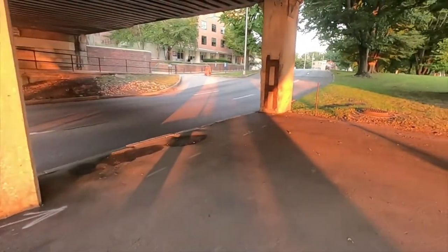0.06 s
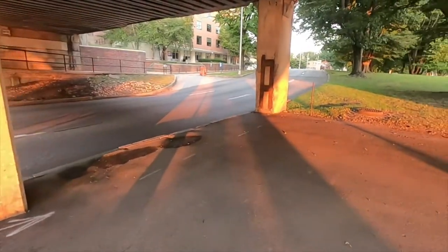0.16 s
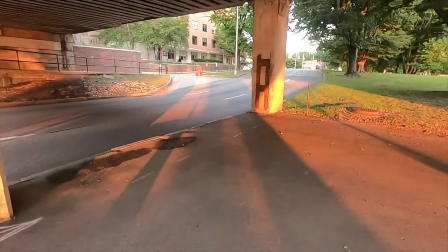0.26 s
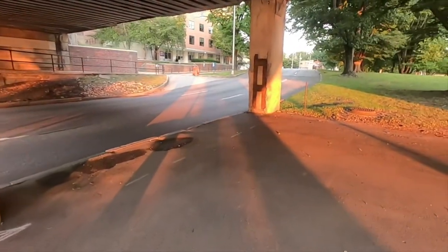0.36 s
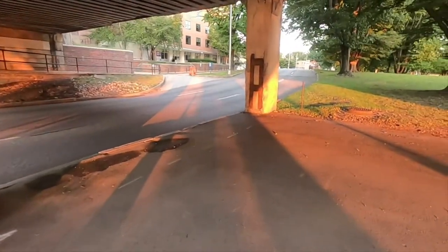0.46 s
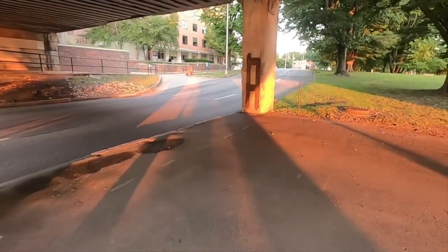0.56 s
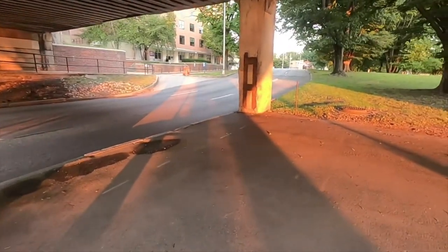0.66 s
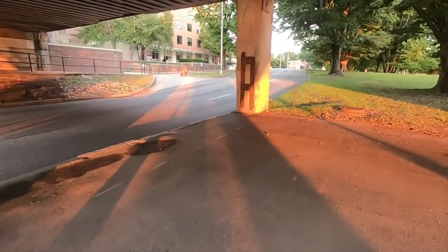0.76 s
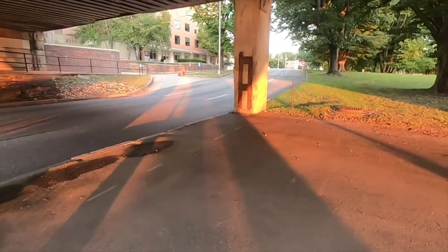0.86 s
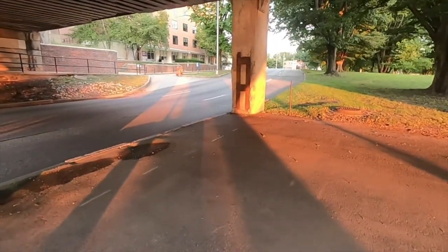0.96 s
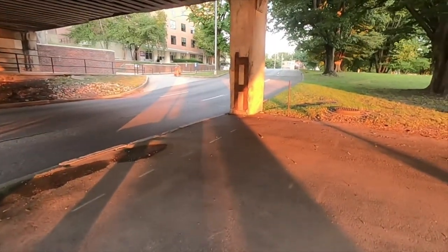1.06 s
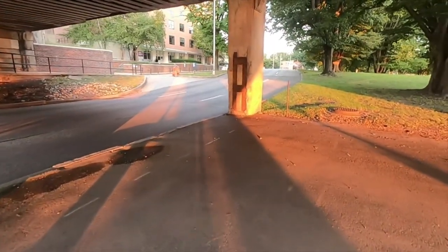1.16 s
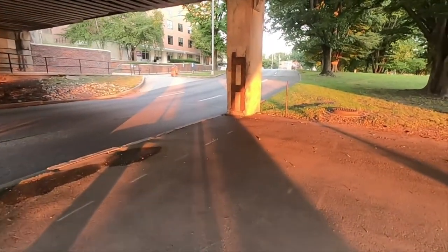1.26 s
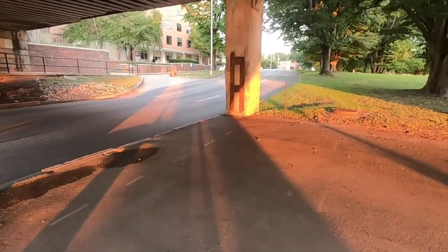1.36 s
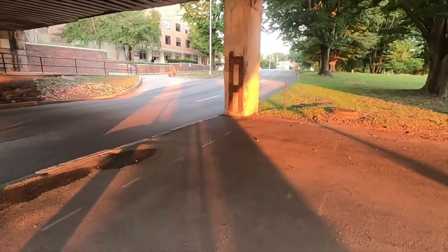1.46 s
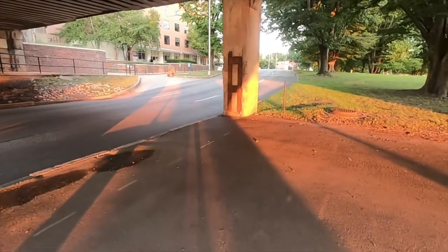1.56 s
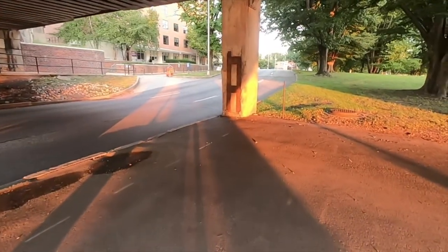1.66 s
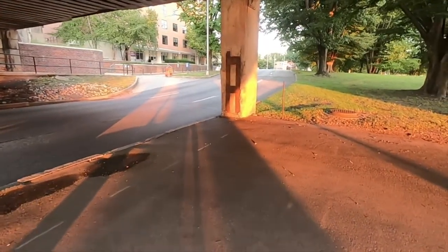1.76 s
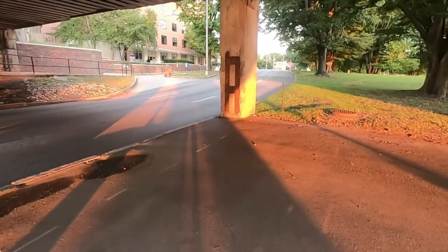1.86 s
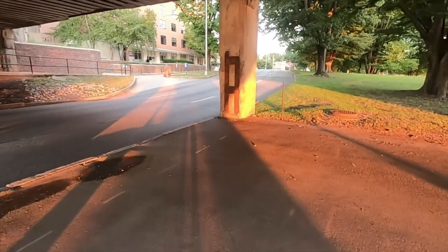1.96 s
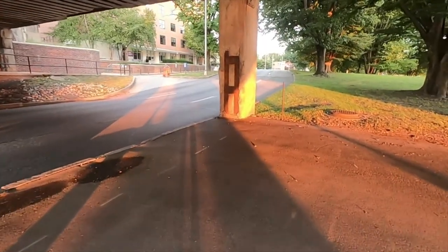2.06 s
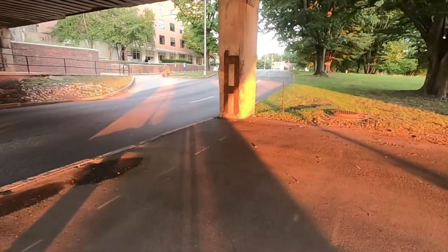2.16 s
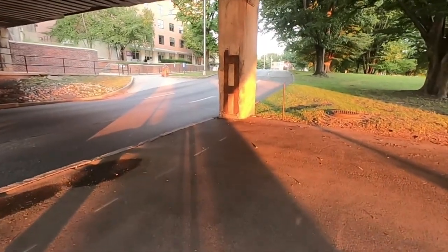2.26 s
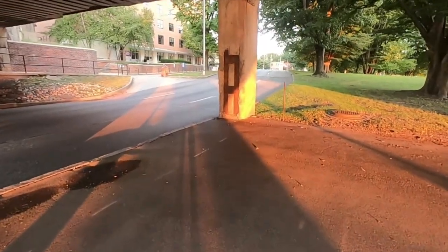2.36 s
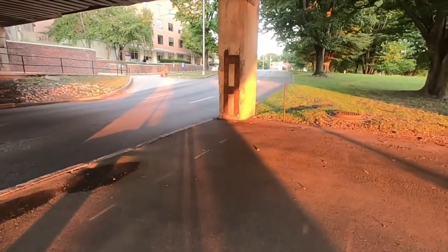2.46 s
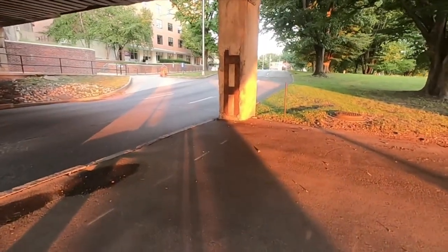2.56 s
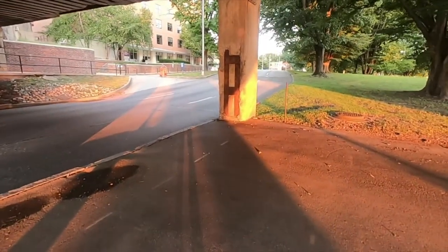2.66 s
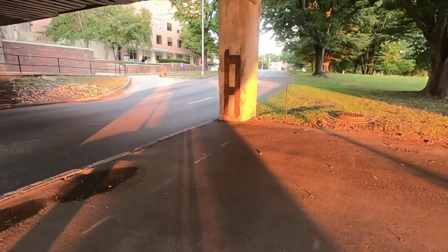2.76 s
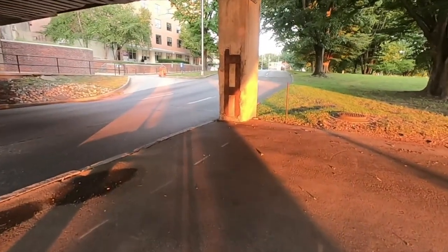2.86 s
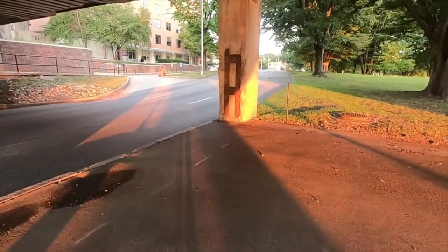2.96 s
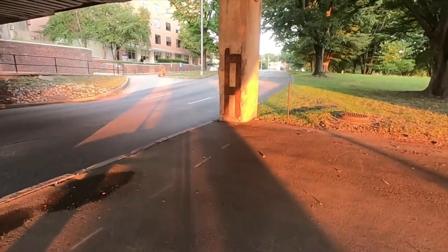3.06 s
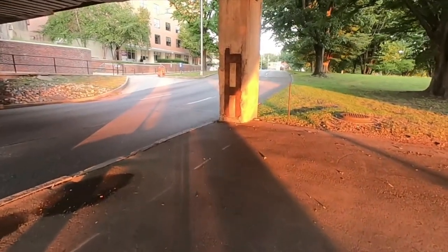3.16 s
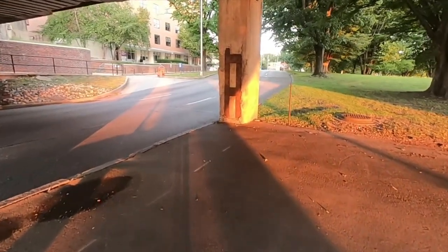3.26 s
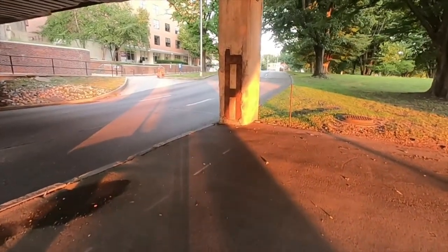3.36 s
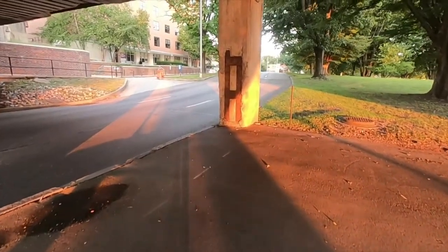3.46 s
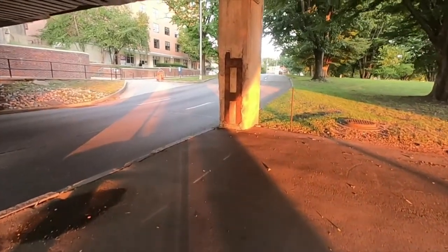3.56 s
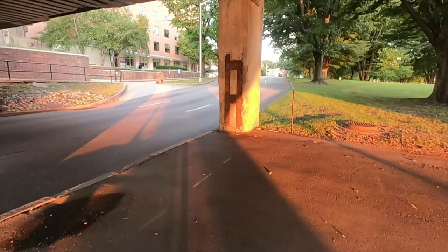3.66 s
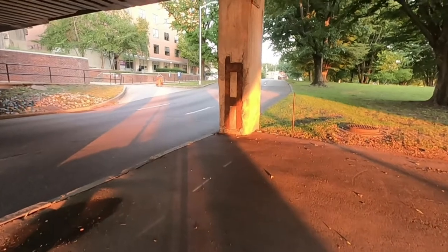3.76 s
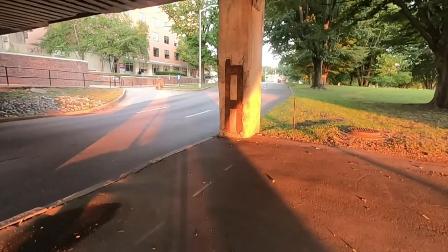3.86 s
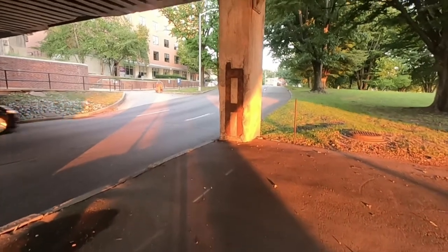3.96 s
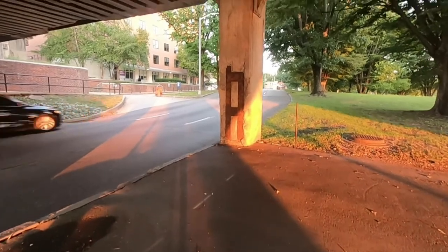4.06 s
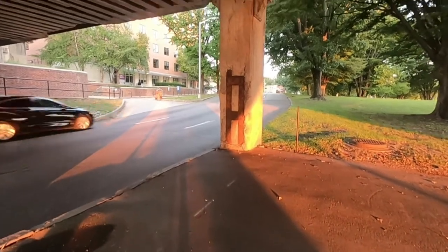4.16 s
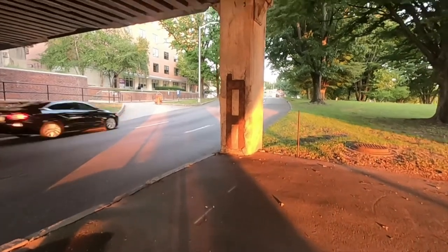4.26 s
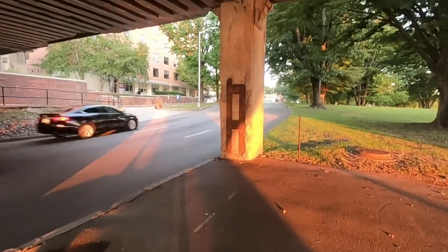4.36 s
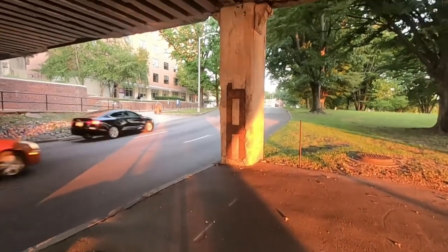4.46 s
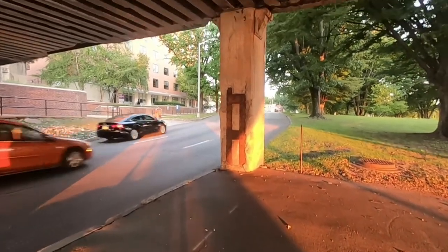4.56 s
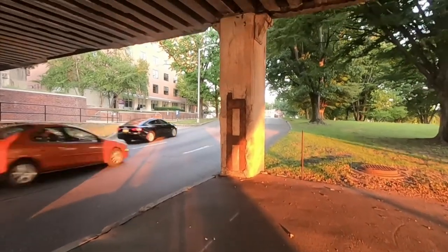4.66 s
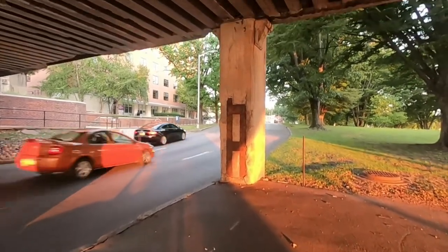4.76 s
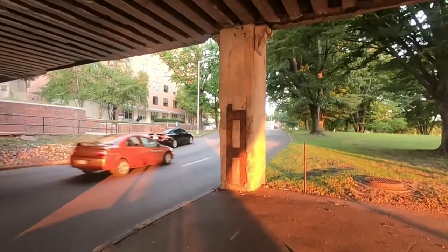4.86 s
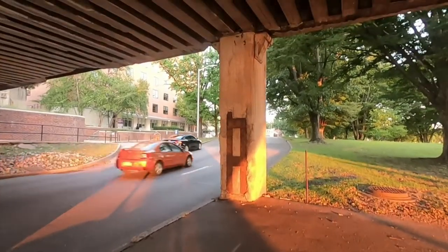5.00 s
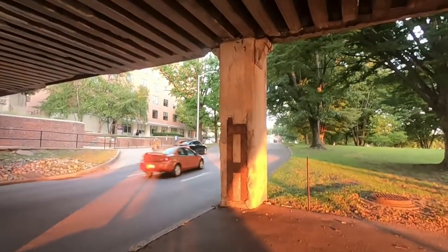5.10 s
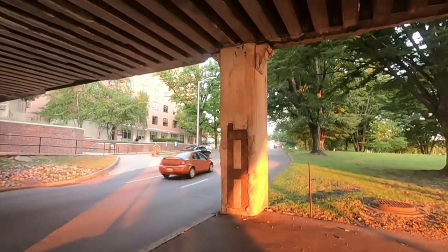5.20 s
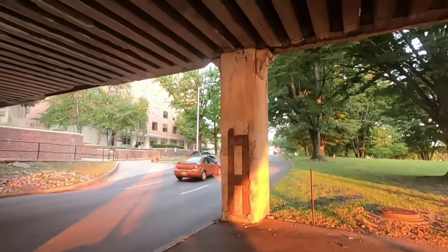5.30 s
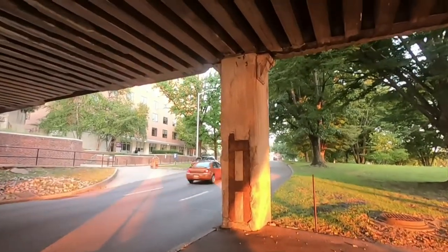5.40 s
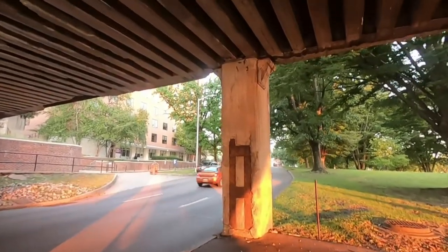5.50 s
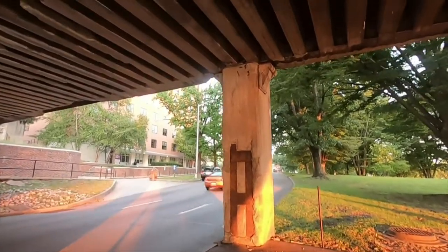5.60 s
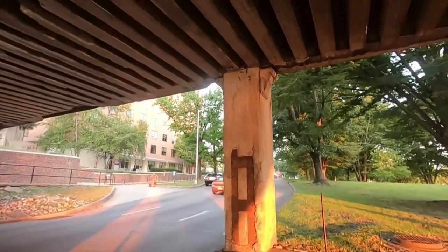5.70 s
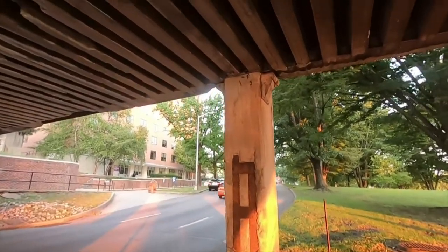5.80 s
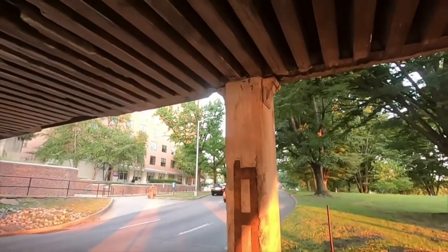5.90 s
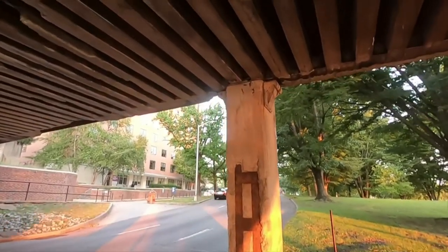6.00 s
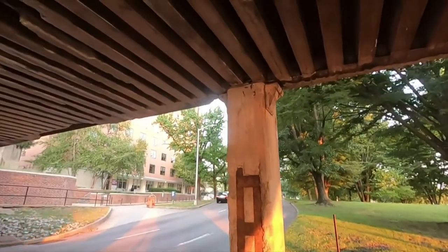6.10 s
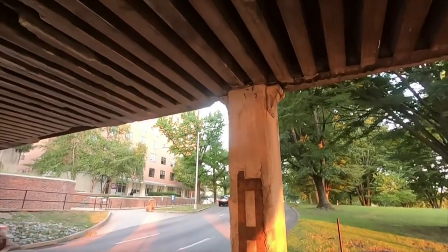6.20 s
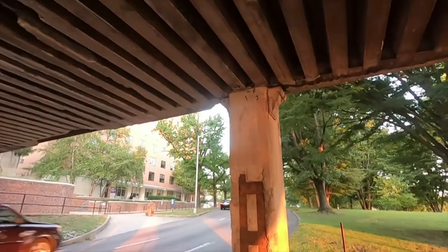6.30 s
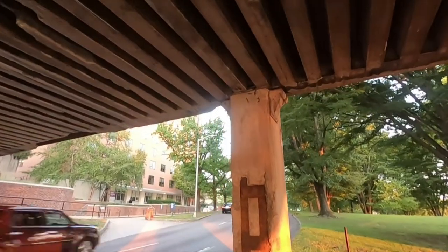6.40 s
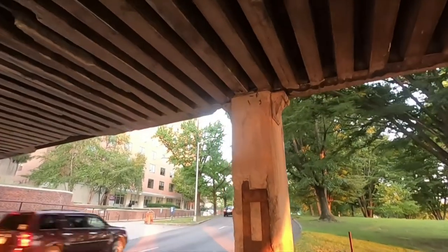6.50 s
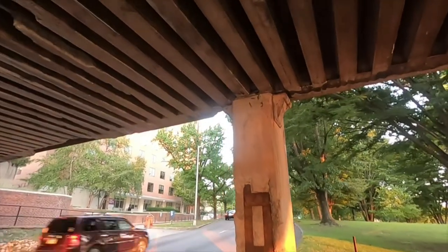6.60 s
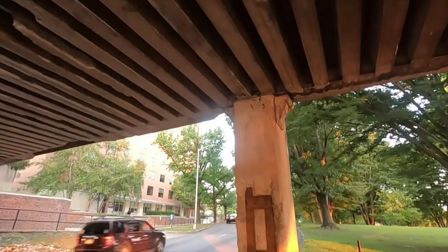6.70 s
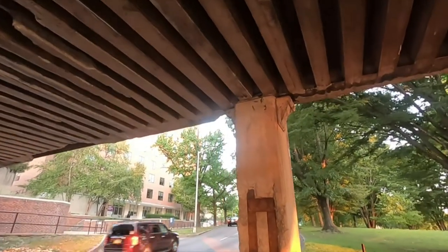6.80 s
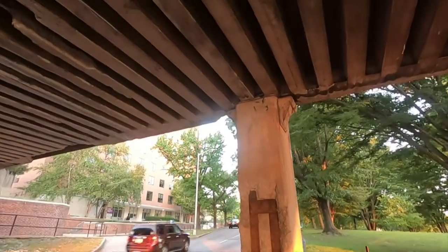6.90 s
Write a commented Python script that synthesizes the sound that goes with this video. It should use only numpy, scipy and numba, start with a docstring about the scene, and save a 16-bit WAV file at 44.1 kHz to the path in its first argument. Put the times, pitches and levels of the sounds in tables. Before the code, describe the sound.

Under a bridge, low traffic rumble and a small knock give way to cars passing close, their tyre roar swelling and fading on the road.

```python
"""Three cars roll through an underpass after a more distant one, from the pavement under the bridge deck.
They pass 3.5 to 8 m from one microphone. Tyre roar is coloured noise set by each car's distance and bearing,
with gliding resonances; the air ring inside the tyres and the low engine drones are wavering sines.
Behind lie bridge throb, far traffic and tree hiss as noise, and a steady hum as a sine;
close by, a small knock sums damped modes and brief rustles are swells of high noise."""
import sys
import numpy as np
from scipy import signal
from scipy.fft import rfft, irfft, next_fast_len
from scipy.io import wavfile
from scipy.ndimage import uniform_filter1d
from numba import njit

SR = 44100
rng = np.random.default_rng(int(sys.argv[2]) if len(sys.argv) > 2 else 0)


def store_wav(level_fs):
    """Save 16-bit WAV to argv[1]."""
    pcm = np.round(np.clip(np.atleast_2d(level_fs), -1, 1) * 32767)
    wavfile.write(sys.argv[1], SR, pcm.T.astype(np.int16))


N = 306054
T = np.arange(N) / SR


def undb(db):
    """Decibels to gain."""
    return 10 ** (np.asarray(db) / 20)


def curves(table):
    """Columns of a table, the first being seconds, drawn as straight lines through every sample."""
    s, *columns = np.transpose(table)
    return [np.interp(T, s, c) for c in columns]


def colour(x, points, skirt_db=-30):
    """Filter by (Hz, dB) points joined on a log axis; outside them the gain changes by skirt_db an octave."""
    hz, db = np.transpose(points)
    size = next_fast_len(N)
    octave = np.log2(np.arange(size // 2 + 1) * SR / size + 1)
    below = np.maximum(np.log2(hz[0]) - octave, 0)
    above = np.maximum(octave - np.log2(hz[-1]), 0)
    gain = undb(np.interp(octave, np.log2(hz), db) + skirt_db * (below + above))
    return irfft(rfft(x, size) * gain, size)[:N]


def walk(rate):
    """Random levels held about 1 / rate seconds and smoothed twice over that time; spread 1."""
    coarse = T[::64]
    hold = max(int(len(coarse) / T[-1] / rate), 1)
    steps = np.repeat(rng.standard_normal(len(coarse) // hold + 1), hold)
    smooth = uniform_filter1d(uniform_filter1d(steps, hold), hold)[:len(coarse)]
    return np.interp(T, coarse, smooth / smooth.std())


def rush(points, flicker_db, rate, band=None):
    """Coloured noise whose level flickers; rms 1 overall, or within the band (Hz)."""
    x = colour(rng.standard_normal(N), points) * undb(flicker_db * walk(rate))
    if band is None:
        return x / x.std()
    inside = signal.sosfilt(signal.butter(4, band, "bandpass", fs=SR, output="sos"), x)
    return x / inside.std()


WHEEL_HZ = 11.5  # wheel turns per second


def tone(hz, db, span, waver, rate, patchy_db, beat=0):
    """A sine wavering in pitch and level, faded over 0.04 s at the ends of its span (s)."""
    ends = np.clip(np.minimum(T - span[0], span[1] - T) / .04, 0, 1)
    phase = 2 * np.pi * np.cumsum(hz * (1 + waver * walk(rate))) / SR
    # an uneven tyre makes the ring throb once a turn
    turn = 2 * np.pi * np.cumsum(WHEEL_HZ * (1 + 0.049 * walk(3.06))) / SR
    throb = 1 + beat * np.sin(turn)
    level = undb(db + patchy_db * walk(11.))
    return np.sqrt(2) * level * ends * throb * np.sin(phase)


@njit
def resonate(x, hz, width):
    """State-variable band-pass with a moving centre, gain 1 there."""
    y, b, l = np.empty(len(x)), 0., 0.
    for i in range(len(x)):
        g, k = np.tan(np.pi * hz[i] / SR), width / hz[i]
        v = (b + g * (x[i] - l)) / (1 + g * (g + k))
        b, l, y[i] = 2 * v - b, l + 2 * g * v, k * v
    return y


# Background levels. Each row: time in seconds, then bridge throb, town rumble and tree hiss, each in dB.
BACKGROUND_DB = [(0, -29, -28.5, -49.5), (.4, -28, -28, -51), (.9, -30, -28, -50.5), (1.5, -32, -28, -51.5),
                 (2.1, -27, -26, -52), (2.7, -29.5, -26.5, -50.5), (3.3, -31.5, -27.5, -50.5),
                 (4.7, -34, -23.5, -50.5), (5.1, -36, -30, -52), (5.4, -40, -25.5, -55),
                 (5.7, -37, -27, -52), (5.95, -39, -25, -53.5), (6.1, -40, -26.5, -50.5),
                 (6.3, -42, -25, -55), (6.94, -35.5, -32, -57)]
# Colour of the deck's throb. Each row: frequency in Hz, gain in dB.
BRIDGE_COLOUR = [(18, -17.5), (25, -4), (35, 1), (48, -2.5), (60, -12.5)]


def bridge_throb():
    """Deep throb of the bridge: flickering noise around 35 Hz."""
    return undb(curves(BACKGROUND_DB)[0]) * rush(BRIDGE_COLOUR, flicker_db=1.5, rate=9)


# Colour of the town's rumble. Each row: frequency in Hz, gain in dB.
RUMBLE_COLOUR = [(42, -8), (55, -1.5), (65, 3.5), (75, 1.5), (92, -0.5), (110, -3.5), (140, -8.5),
                 (220, -12), (330, -15.5), (500, -23), (1000, -43.5)]


def far_traffic():
    """Far traffic: low rumbling noise, strongest around 65 Hz."""
    return undb(curves(BACKGROUND_DB)[1]) * rush(RUMBLE_COLOUR, flicker_db=1.0, rate=10)


# Colour of the trees. Each row: frequency in Hz, gain in dB.
TREE_COLOUR = [(2800, -1.5), (3600, 0.5), (4400, -0.5), (5200, -1), (6300, -7), (7500, -13.5), (8700, -21),
               (10400, -38.5), (11500, -48)]


def tree_hiss():
    """Thin hiss from the trees: noise strongest from about 3 to 5 kHz."""
    return undb(curves(BACKGROUND_DB)[2]) * rush(TREE_COLOUR, flicker_db=0.6, rate=8.3)


# Level of the steady hum. Each row: time in seconds, level in dB.
HUM_LEVEL = [(0, -33), (.12, -29), (.45, -29), (.75, -27), (.92, -35), (1.0, -27.5), (1.4, -27.5),
             (1.5, -38), (1.65, -27), (2.05, -29), (2.7, -34), (3.0, -42), (3.5, -33), (3.8, -45),
             (6.94, -52)]


def steady_hum():
    """A hum steady near 84.2 Hz, its level drifting; its span outlasts the scene, so its ends are not heard."""
    return tone(84.2, *curves(HUM_LEVEL), (-1, 8), .004, 5, patchy_db=1.2)


# A small knock close by. Each row: start in seconds, level in dB.
KNOCK_TIMES = [(.262, -14.5)]
# What the blow sets ringing. Each row: frequency in Hz, relative level in dB, 60 dB decay time in seconds.
STRUCK_MODES = [(620, -16, .05), (900, -9, .025), (1250, 0, .007), (1700, -1, .005), (2300, -10, .004),
                (4200, -26, .004), (8500, -36, .006)]


def knock():
    """A sharp blow sets off short modes that each die away exponentially."""
    out, t = np.zeros(N), T[:SR // 20]
    blow = (1 - np.exp(-t / .0003)) ** 2  # soft onset of the contact
    for s, level_db in KNOCK_TIMES:
        start = int(s * SR)
        for hz, db, t60 in STRUCK_MODES:
            ring = -np.sin(2 * np.pi * hz * t) * np.exp(-np.log(1000) * t / t60)
            out[start:start + len(t)] += undb(level_db + db) * blow * ring
    return out


# Brief high rustles. Each row: time of the crest in seconds, rise in seconds, fall in seconds, level in dB.
RUSTLE_SWELLS = [(.252, .034, .022, -64), (.29, .02, .05, -73), (4.2, .03, .2, -69)]


def rustles():
    """Brief bell-shaped swells of high, quickly flickering noise."""
    swell = np.zeros(N)
    for s, rise, fall, db in RUSTLE_SWELLS:
        swell += undb(db) * np.exp(-((T - s) / np.where(T < s, rise, fall)) ** 2)
    high = rush([(6000, -15), (9000, 2), (12000, -6), (15000, -20)], flicker_db=2.5, rate=150)
    return swell * high


# Engine firing tones that stand out for a while.
# Each row: start in seconds, end in seconds, first pitch in Hz, last pitch in Hz, level in dB.
FIRING_TONES = [(1.1, 1.35, 180, 181, -39), (3.7, 4.5, 64.5, 62.5, -32), (3.3, 3.65, 120, 121, -31),
                (4.1, 4.4, 124, 123, -31.5), (4.55, 5.3, 74.5, 73.5, -29), (4.9, 5.6, 143, 157, -33),
                (6.35, 6.9, 150, 152, -31)]


def engines():
    """Firing tones gliding as engines pass and change speed."""
    out = np.zeros(N)
    for s0, s1, hz0, hz1, db in FIRING_TONES:
        hz = np.interp(T, [s0, s1], [hz0, hz1])
        out += tone(hz, db, (s0, s1), .012, 12, patchy_db=2.5)
    return out


# Tread whines that stand out of the roar for a while. Each row: start in seconds, end in seconds,
# first pitch in Hz, last pitch in Hz, width of each of two resonances in Hz, level in dB.
TREAD_WHINES = [(1.33, 2.7, 963, 1033, 98, -40), (1.4, 2.2, 1580, 1560, 100, -41),
                (2.9, 3.7, 1600, 1560, 110, -41), (2.1, 3.4, 2000, 1950, 200, -45.5),
                (1.4, 2.9, 1810, 1780, 130, -43), (1.55, 2.3, 765, 720, 52, -44),
                (2.59, 3, 764, 720, 83, -33.5), (3, 3.2, 1060, 1070, 110, -36),
                (3.69, 4.37, 890, 766, 91, -30.5), (4.95, 5.86, 1275, 1220, 170, -32.5),
                (5.5, 6.5, 1800, 1660, 220, -40), (3.4, 4.7, 1680, 1600, 150, -44),
                (0.77, 1.7, 2060, 2060, 200, -49), (1.7, 2.6, 1140, 1090, 90, -41.5),
                (6.4, 6.9, 1550, 1510, 130, -39.5), (6.5, 7.07, 820, 780, 130, -32.5)]


def whines():
    """Narrow gliding bands of noise, swelling and fading over each span."""
    out = np.zeros(N)
    for s0, s1, hz0, hz1, width, db in TREAD_WHINES:
        hz = np.interp(T, [s0, s1], [hz0, hz1]) * (1 + .01 * walk(5))
        once = resonate(rng.standard_normal(N), hz, 1. * width)
        band = resonate(once, hz, 1. * width)
        swell = np.sqrt(np.sin(np.pi * np.clip((T - s0) / (s1 - s0), 0, 1)).clip(0))
        out += undb(db) * swell * band / band.std()
    return out


# The cars, the first out of sight and further off. Each row: time abreast of the microphone in seconds,
# speed in m/s, lane distance in metres, tread pitch in Hz and groove pitch in Hz, both before Doppler shift.
CAR_PASSES = [(2.74, 13.9, 7.7, 808, 1560), (4.1, 13.3, 4.99, 718, 1450), (4.54, 13.3, 3.53, 840, 1394),
              (6.259, 13.3, 7.03, 725, 1410)]


def passing():
    """For each car: metres still to go, doublings of its closest distance, cosine of approach, Doppler factor."""
    s, speed, lane = np.transpose(CAR_PASSES)[:3, :, None]
    along = speed * (s - T)
    metres = np.hypot(along, lane)
    facing = along / metres
    return along, np.log2(metres / lane), facing, 1 + speed * facing / 343  # sound travels at 343 m/s


OPEN_M = 15.5  # further up the road than this, the abutment screens a car
# Tyre layers by name, before any sway. Each row: far traffic in dB, each of four cars abreast in dB,
# dB lost per doubled distance, extra dB thrown ahead, dB lost per screened metre, dB lost per metre driven away;
# a negative loss is a gain.
TYRE_LAYERS = {"boom": (-34.5, -42, -31, -31.5, -29, 1.5, -0.5, 3.5, .05),
               "belt": (-52.5, -46, -34, -29, -28, 3.5, 0.15, 0.06, 0.02),
               "wall": (-41, -35, -31, -24.5, -26.5, 5.5, -1.3, 0.5, -0.08),
               "roar": (-41, -29, -26.5, -23, -25.5, 4.5, -2.5, 0, 0.05),
               "groove": (-52.5, -33, -42, -33, -34, 2, -0.1, 0.28, 0.15),
               "sizzle": (-83, -80.5, -68.5, -68, -71.5, 3, -3, 2, 0.25)}


def layer(name):
    """Gain of a tyre layer, and the share that far traffic and each car have in its power."""
    far_db, *near_db, loss_db, ahead_db, screen_db, away_db = TYRE_LAYERS[name]
    along, doublings, facing, _ = passing()
    cars_db = np.array(near_db)[:, None] - loss_db * doublings + ahead_db * facing
    cars_db -= screen_db * np.maximum(along - OPEN_M, 0)
    cars_db -= away_db * np.maximum(-along, 0)
    power = undb(np.vstack([np.full(N, far_db), cars_db])) ** 2
    total = power.sum(axis=0)
    return np.sqrt(total), power / total


def blended_pitch(share, far_hz, column):
    """Mean pitch of far traffic and the Doppler-shifted cars, weighted by power so the loudest leads."""
    car_hz = np.transpose(CAR_PASSES)[column][:, None] * passing()[-1]
    return share[0] * far_hz + (share[1:] * car_hz).sum(axis=0)


# Colour of the tyre carcass. Each row: frequency in Hz, gain in dB.
CARCASS_COLOUR = [(100, -7.5), (125, 4.5), (150, 4.5), (175, 5.5), (205, -5)]
# Colour of the tyre belt. Each row: frequency in Hz, gain in dB.
BELT_COLOUR = [(165, -18), (195, -1.5), (230, -0.5), (270, -3.5), (320, -17.5)]


def carcass_and_belt():
    """Low boom of the tyre carcass, and the belt's noise just above it."""
    carcass = layer("boom")[0] * rush(CARCASS_COLOUR, flicker_db=2.0, rate=3.82)
    return carcass + layer("belt")[0] * rush(BELT_COLOUR, flicker_db=1.0, rate=5.5, band=(228, 290))


# Colour of the sidewalls. Each row: frequency in Hz, gain in dB.
SIDEWALL_COLOUR = [(260, -16), (320, -0.5), (400, -1), (550, -2.5), (700, -5.5)]
# Colour of the tread blocks. Each row: frequency in Hz, gain in dB.
TREAD_COLOUR = [(500, -8.5), (650, -0.5), (780, -2), (1000, 0), (1300, -2.5), (1700, -22)]
# Swells and dips of the middle of the roar. Each row: time in seconds, gain in dB.
MIDDLE_SWAY = [(0, -3), (.9, -3.5), (1.2, -2), (1.6, -.5), (2.2, 0), (3.0, -.5), (3.5, .5), (3.9, 1.5),
               (4.0, .5), (4.15, 2), (4.3, .5), (4.4, 1), (4.52, -1), (4.7, -1.5), (4.85, -3), (5.1, -.5),
               (5.4, -2), (5.8, -.5), (6.15, 1.5), (6.35, .5), (6.94, -1)]


def sidewalls_and_tread():
    """Middle of the roar: sidewall noise, and tread-block noise with a resonance at the tread pitch."""
    sidewalls = layer("wall")[0] * rush(SIDEWALL_COLOUR, flicker_db=1.17, rate=8)
    roar = rush(TREAD_COLOUR, flicker_db=0.96, rate=8)
    gain, share = layer("roar")
    lifted = resonate(roar, blended_pitch(share, far_hz=970, column=3), 200.)
    tread = gain * (0.72 * roar + 0.54 * lifted)
    return undb(*curves(MIDDLE_SWAY)) * (sidewalls + tread)


# Colour of the air pumped from the grooves. Each row: frequency in Hz, gain in dB.
GROOVE_COLOUR = [(1000, -4), (1250, -2.5), (1700, -3), (2100, -6), (2600, -14), (3000, -16), (3300, -17),
                 (4200, -26), (6000, -39)]
# Swells and dips of the groove hiss. Each row: time in seconds, gain in dB.
GROOVE_SWAY = [(0, 0.5), (.9, .5), (2.0, -0.5), (3.2, -1), (3.6, 0), (4.6, -0.5), (5.15, 1.5), (5.35, -1),
               (5.75, 1.5), (6.1, 0.5), (6.25, -0.5), (6.94, -.5)]


def groove_air():
    """Air pumped from the grooves: broad hiss with a resonance at the groove pitch."""
    hiss = rush(GROOVE_COLOUR, flicker_db=0.62, rate=7.9)
    gain, share = layer("groove")
    lifted = resonate(hiss, blended_pitch(share, far_hz=1750, column=4), 260.0)
    return undb(*curves(GROOVE_SWAY)) * gain * (0.84 * hiss + 0.63 * lifted)


# Colour of the grit. Each row: frequency in Hz, gain in dB.
GRIT_COLOUR = [(5500, 0), (7500, 0), (8700, -2), (10400, -6), (11500, -11), (12500, -13.5), (13500, -17),
               (14300, -26)]


def grit():
    """Grit under the tyres: a faint high sizzle."""
    return layer("sizzle")[0] * rush(GRIT_COLOUR, flicker_db=.6, rate=12, band=(9000, 13500))


# Air-ring pitch of the three near cars, before Doppler shift. Each entry: frequency in Hz.
AIR_RING_HZ = [199, 221.8, 203.3]
# Level of each near car's air ring, swelling and dropping out as pillars and echoes come between.
# One list for each car. Each row: time in seconds, level in dB.
AIR_RING_LEVELS = [
    [(3.3, -43), (3.6, -29), (3.9, -36.5), (3.97, -21.5), (4.1, -31), (4.25, -46)],
    [(2.55, -42.5), (2.83, -32.5), (3.0, -41), (3.32, -29), (3.5, -40), (4.09, -33), (4.3, -25), (4.5, -43),
     (4.95, -27), (5.25, -29), (5.45, -42)],
    [(5.4, -36), (5.5, -25), (5.57, -31), (5.6, -19), (5.67, -22), (5.71, -30), (5.77, -17), (5.82, -21),
     (5.865, -17), (5.89, -26), (5.95, -42), (5.99, -19), (6.04, -32), (6.09, -25), (6.14, -31),
     (6.165, -16.5), (6.21, -15.5), (6.27, -20), (6.3, -18), (6.335, -21), (6.365, -15), (6.405, -26),
     (6.435, -13.5), (6.49, -17), (6.59, -16), (6.62, -24), (6.645, -14), (6.69, -21), (6.73, -15),
     (6.77, -19), (6.8, -27), (6.83, -24), (6.94, -33)],
]


def air_rings():
    """The ring of air inside the tyres hums at its own pitch, Doppler shifted, throbbing once a wheel turn."""
    out = np.zeros(N)
    for rest_hz, doppler, level in zip(AIR_RING_HZ, passing()[-1][1:], AIR_RING_LEVELS):
        span = (level[0][0], level[-1][0])
        out += tone(rest_hz * doppler, *curves(level), span, 0.007, 25, patchy_db=1.0, beat=.1)
    return out


def tyres():
    """All that the tyres sound: carcass, belt, sidewalls, tread blocks, groove air, grit and air rings."""
    return carcass_and_belt() + sidewalls_and_tread() + groove_air() + grit() + air_rings()


def scene():
    """All sources at one microphone."""
    background = bridge_throb() + far_traffic() + tree_hiss() + steady_hum()
    close_by = knock() + rustles()
    cars = engines() + whines() + tyres()
    return (background + close_by + cars)[None]


# Colour of the microphone port. Each row: frequency in Hz, gain in dB.
PORT_COLOUR = [(8900, 0), (9500, -5), (10400, 1), (10900, 0), (11400, -2)]


def record(dry):
    """Microphone port colour, then a steep cut of the top above 14.3 kHz."""
    edge = np.minimum(np.minimum(T, T[::-1]) / .002, 1)  # 2 ms fades
    heard = colour(dry[0] * edge, PORT_COLOUR, skirt_db=0)
    return signal.sosfilt(signal.ellip(6, .3, 40, 14300, fs=SR, output="sos"), heard)[None]


dry = scene()
out = record(dry)
store_wav(out)
```